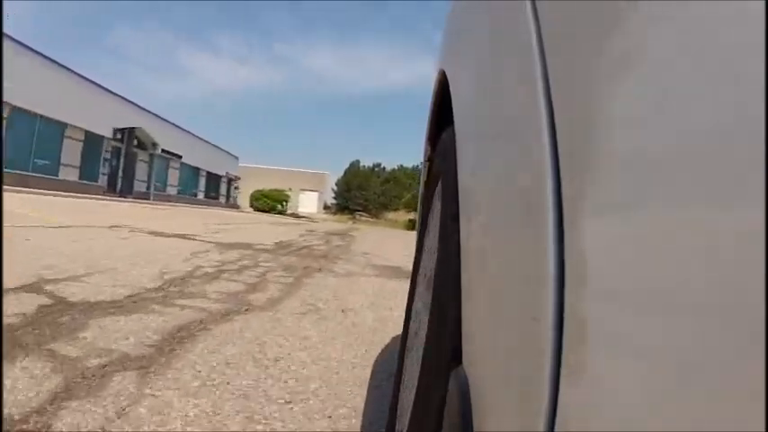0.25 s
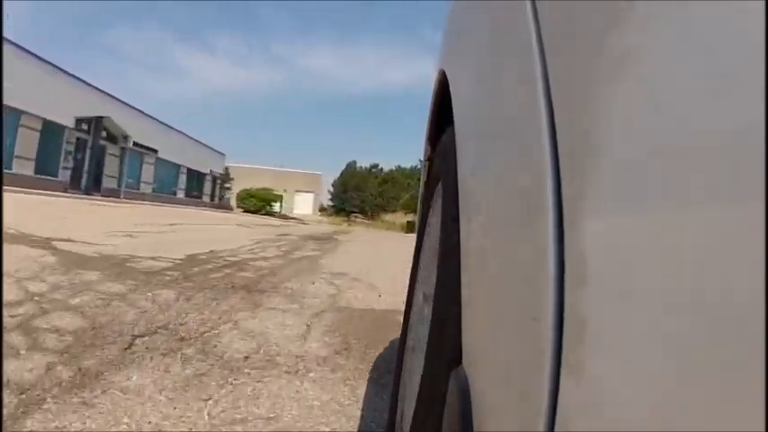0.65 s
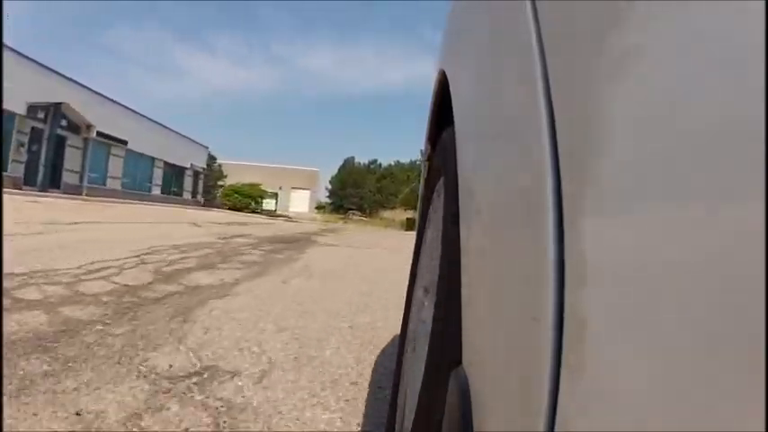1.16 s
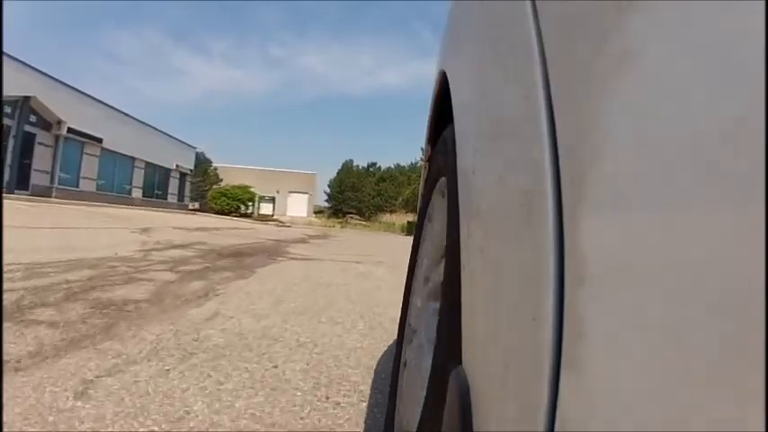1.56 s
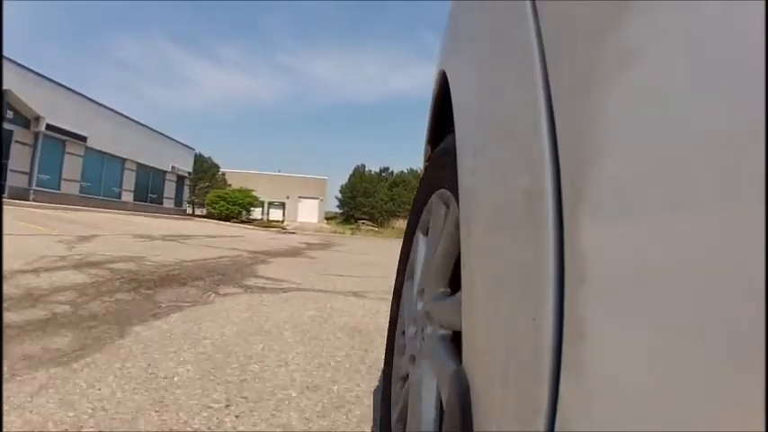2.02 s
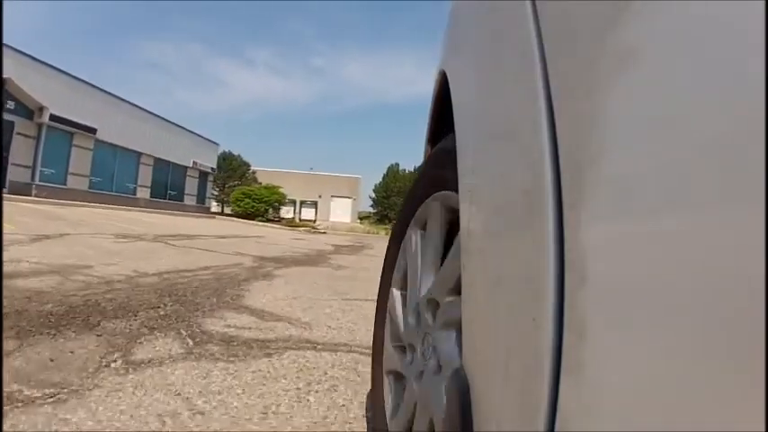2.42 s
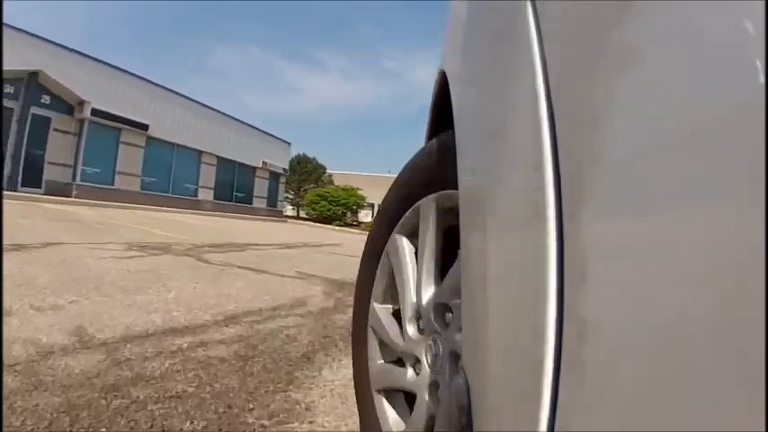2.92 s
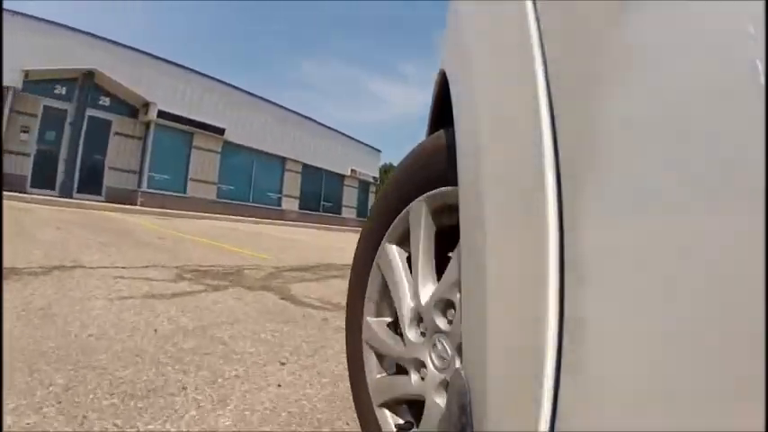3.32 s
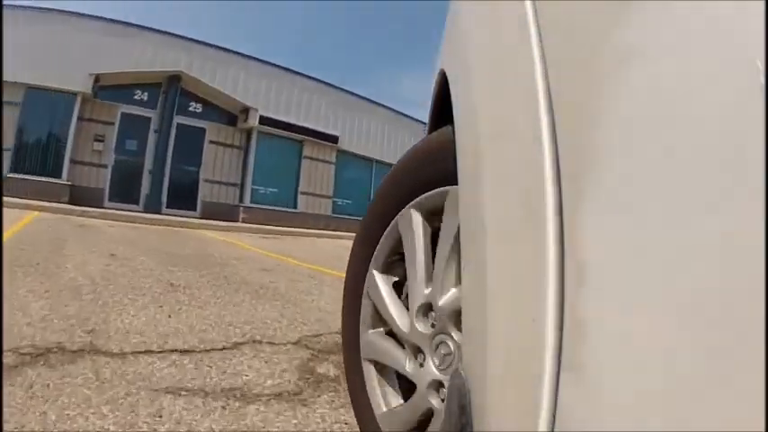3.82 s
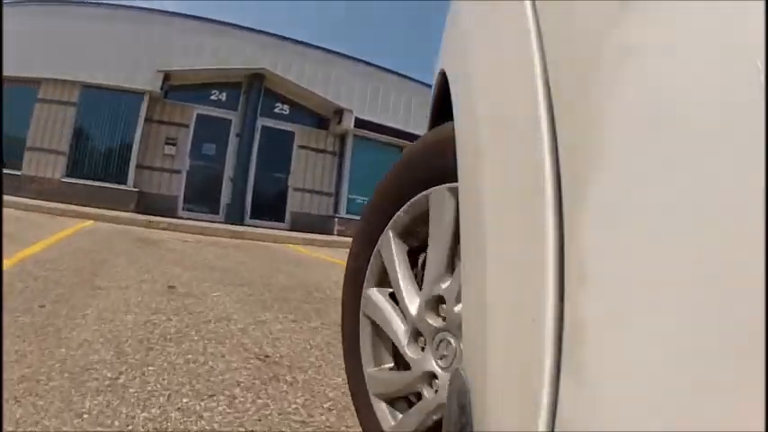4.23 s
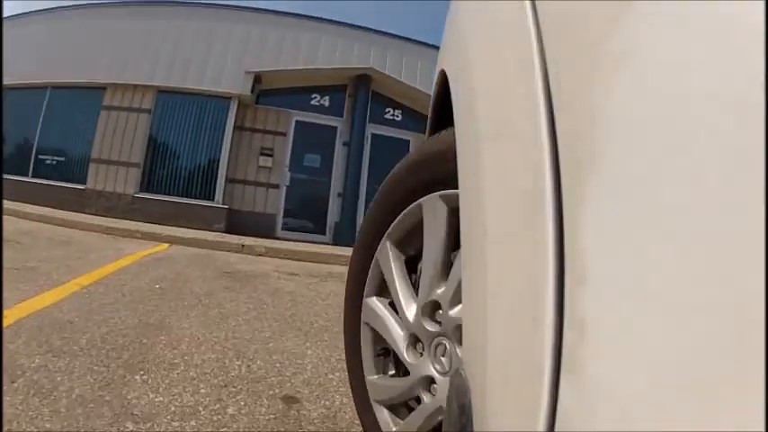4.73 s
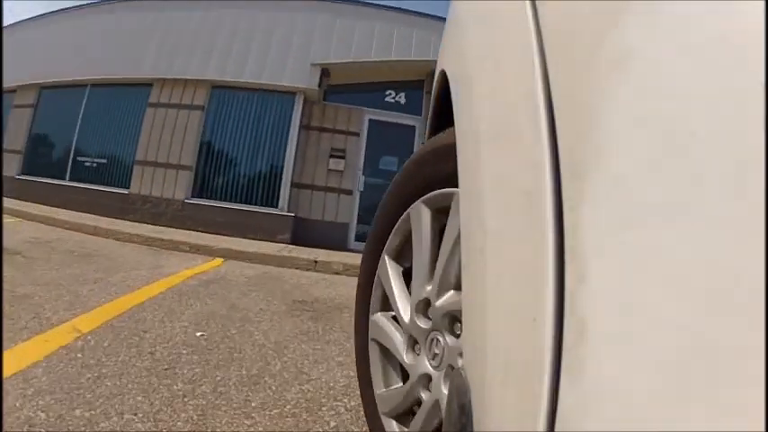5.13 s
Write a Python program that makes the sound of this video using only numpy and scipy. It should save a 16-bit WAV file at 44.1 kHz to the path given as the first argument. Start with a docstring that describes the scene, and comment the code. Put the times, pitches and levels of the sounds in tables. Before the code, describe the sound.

Close to the front wheel of a slow car, a low tyre rumble runs with light crunching and soft thumps from broken parking lot asphalt. One small stone knocks on the body early on. Later, sharp pops and clicks come more often, with two loud knocks on the panel, followed by a faint, high brake whistle. The microphone adds slight hiss and ticking.

```python
"""A car creeps over cracked, gritty asphalt; the microphone is on the body, close behind a front tyre.
From the start the tyre rumbles and crushes grit, over faint microphone hiss and ticking, and soon it
bumps over cracks and rocks through hollows. From a second in, stones snap out from under the tread and
three knock on the bodywork, loudest near the end. Last, the brake sings faintly as the car slows."""
import sys
import numpy as np
from scipy import signal
from scipy.fft import rfft, irfft
from scipy.io import wavfile
from scipy.ndimage import uniform_filter1d, map_coordinates

SR = 44100
rng = np.random.default_rng(int(sys.argv[2]) if len(sys.argv) > 2 else 0)


def inscribe(sig):
    """Save sig as 16-bit PCM at rate SR to the path in sys.argv[1].

    A 1-D sig is mono; a 2-D sig holds one channel per row.
    Samples are clipped to [-1, 1] before scaling.
    """
    pcm = np.round(np.clip(np.atleast_2d(sig).T, -1, 1) * 32767)
    wavfile.write(sys.argv[1], SR, pcm.astype(np.int16))


N = 236860
TIME = np.arange(N) / SR

# cracks under the tyre: start_s, bump_db, rise_s, pitch_hz, grit_db
CRACKS = [(0.47, -48.5, .015, 290, -54), (1.114, -50.5, 0.0035, 438, -48), (1.488, -36, 0.011, 205, -55),
          (1.561, -47.5, 0.013, 251, -52.5), (2.114, -43, 0.0022, 300, -54),
          (2.214, -54.5, 0.0068, 303, -66), (2.247, -49, 0.0072, 241, -57.5),
          (2.838, -47, 0.0029, 277, -61.5)]
# stones hitting the bodywork: start_s, knock_db, snap_db, snap_hz, brightness_hz
STRIKES = [(1.054, -25, -56, 3130, 4330), (4.316, -8, -9.5, 3740, 6160), (4.964, -10, -15.5, 4170, 5350)]
DROP_LAG_S, DROP_RISE_S = 0.04, 0.0044  # after a knock the stone drops back under the tread
PING_HZ, PING_T60_S = 6266, 0.11  # a metal part that the stones set ringing


def from_db(db):
    """Decibels to gain."""
    return 10 ** (np.asarray(db) / 20)


def rms_one(x):
    """Scale to unit rms."""
    return x / np.sqrt(np.mean(x ** 2) + 1e-20)


def in_time(curve):
    """A curve of (time, value) rows at every sample."""
    return np.interp(TIME, *np.transpose(curve))


def cut(x, hz, kind, order=2):
    """Butterworth filter."""
    return signal.sosfilt(signal.butter(order, hz, kind, fs=SR, output="sos"), x + 1e-18)


def coloured(x, spectrum):
    """Give a noise a spectrum; rms 1."""
    hz, db = np.transpose(spectrum)
    bin_hz = np.maximum(np.arange(N // 2 + 1) * SR / N, 1)
    gain = from_db(np.interp(np.log(bin_hz), np.log(hz), db))
    return rms_one(irfft(rfft(x) * gain, N))


def resonance(x, hz, width_hz):
    """Two-pole band-pass with gain 1 at its peak."""
    radius = np.exp(-np.pi * width_hz / SR)
    feedback = [1, -2 * radius * np.cos(2 * np.pi * hz / SR), radius ** 2]
    return signal.lfilter(np.array([1, 0, -1]) * (1 - radius ** 2) / 2, feedback, x + 1e-18)


def drift(per_s):
    """Smooth random wander; rms 1."""
    knots = rng.standard_normal(4096)
    return rms_one(map_coordinates(knots, [TIME * per_s], order=3, mode="wrap"))


def grains(spread_db, size=N):
    """Dense tiny contacts of uneven strength; rms 1."""
    contacts = rng.standard_normal(size)
    strength_db = spread_db * np.clip(rng.standard_normal(size), -3, 3)
    return rms_one(contacts * from_db(strength_db))


def age():
    """Seconds since a contact."""
    return np.arange(24576) / SR


def mode(hz, t60_s, shape=np.sin):
    """Free ringing of one mode."""
    return shape(2 * np.pi * hz * age()) * from_db(-60 * age() / t60_s)


def swell(rise_s, shape=1):
    """Pressure builds to 1 at the rise time and dies; a smaller shape starts faster and lingers."""
    return (age() / rise_s * np.exp(1 - age() / rise_s)) ** shape


def burst(hz, width_hz, rise_s, spread_db, shape=1):
    """A cluster of contacts swells and dies in one steep-sided resonance."""
    contacts = grains(spread_db, size=len(age()))
    ring = resonance(resonance(contacts, hz, width_hz), hz, width_hz)
    # the load is steady over six cycles, however the contacts fall
    local_rms = np.sqrt(uniform_filter1d(ring ** 2, int(6 * SR / hz)) + 1e-20)
    return ring / local_rms * swell(rise_s, shape)


def add(out, start_s, sound):
    """Mix a sound in at a time."""
    i = max(round(start_s * SR), 0)
    out[i:i + len(sound)] += sound[:N - i]


def rolling(boom_top_hz=110, rumble_top_hz=500, broken_db=3.5, broken_reach_s=0.053):
    """Road texture shakes the tyre: the carcass booms, the tread rumbles and the road grain rasps."""
    # how hard the road shakes the tyre, falling as the car slows: time_s, level_db
    shaking = [(0.0, -53), (0.73, -58), (1.43, -55.5), (1.78, -58), (2.29, -58), (3.08, -57), (3.38, -56.5),
               (4.28, -58.5), (5.37, -63)]
    # colour of the rolling noise: frequency_hz, level_db
    road_spectrum = [(12, -15), (20, 5), (59, -3), (91, 1.5), (120, -9.5), (146, -2.5), (226, -7.5),
                     (256, -18), (311, -11), (534, -21.5), (618, -22.5), (1530, -30), (1820, -33.5),
                     (7000, -53), (9100, -63), (15400, -120)]
    # resonances of the tyre: pitch_hz, width_hz, lift_db
    tyre_modes = [(85, 12, 6), (175, 75, -1), (239.8, 16, 7.5), (348, 19, 2.5), (688, 150, 4),
                  (1380, 250, 3)]
    shake_db = in_time(shaking)
    swing_db = shake_db - shake_db.mean()
    road = coloured(grains(spread_db=4), road_spectrum)
    tyre = road + sum((from_db(db) - 1) * resonance(road, hz, width) for hz, width, db in tyre_modes)
    # rougher stone, and broken asphalt on both sides of a crack, lift rumble and rasp together
    broken = sum(np.exp(-((TIME - s - rise_s) / broken_reach_s) ** 2) for s, _, rise_s, *_ in CRACKS)
    rough_db = 1.5 * drift(per_s=35) + broken_db * broken
    boom = rms_one(cut(tyre, boom_top_hz, "low", order=4))
    rumble = rms_one(cut(tyre, [boom_top_hz, rumble_top_hz], "band", order=3))
    rasp = rms_one(cut(tyre, rumble_top_hz, "high", order=4))
    return (boom * from_db(-59 + 0.8 * swing_db)
            + rumble * from_db(shake_db + 0.6 + rough_db)
            + rasp * from_db(-67 + 0.46 * swing_db + 0.78 * rough_db))


def hiss(level_db=-69.5, side_db=-7, pulse_db=-66, first_pulse_s=0.808, pulse_length_s=0.022):
    """Microphone hiss, mostly central, with a brief pulse of brighter hiss once a second."""
    # colour of the microphone's own noise: frequency_hz, level_db
    hiss_spectrum = [(500, -5.5), (3000, 4), (5600, 2.5), (7500, 0.5), (10000, -0.5), (13000, 1.5),
                     (15000, 1)]
    mid, side = coloured(rng.standard_normal((2, N)), hiss_spectrum)
    steady = mid + from_db(side_db) * side * [[1], [-1]]
    gate = abs((TIME - first_pulse_s + 0.5) % 1 - 0.5) < pulse_length_s / 2
    pulse = gate * rms_one(cut(rng.standard_normal(N), hz=3000, kind="high", order=1))
    return from_db(level_db) * steady + from_db(pulse_db) * pulse


def crunches(edge_hz=760, edge_rise_s=0.0032, drop_hz=2560, sand_hz=950, sand_rise_s=0.005):
    """Grit crumbles in bursts, also at cracks and under dropped stones; fainter sand crushes at random."""
    # grit crushed under the tread: start_s, level_db, rise_s, pitch_hz
    grit = [(0.0, -66, 0.021, 3400), (0.844, -58, 0.0035, 1020), (1.274, -56.5, 0.0021, 806),
            (1.328, -54.5, 0.0036, 1040), (1.419, -53, 0.0027, 1150), (1.552, -71, 0.021, 3540),
            (2.025, -57.5, 0.0035, 1130), (2.025, -65, 0.0095, 3870), (2.07, -61.5, 0.01, 4000),
            (2.088, -57.5, 0.0043, 1500), (2.401, -62.5, 0.008, 1050)]
    edges = [(s, grit_db, edge_rise_s, edge_hz) for s, *_, grit_db in CRACKS]
    drops = [(s + DROP_LAG_S, knock_db - 53, DROP_RISE_S, drop_hz) for s, knock_db, *_ in STRIKES]
    sand = [(s, db, sand_rise_s, sand_hz * 2 ** octaves)
            for s, db, octaves in rng.uniform([0, -69, -0.5], [TIME[-1], -63, 0.5], size=(24, 3))]
    out = np.zeros(N)
    for s, level_db, rise_s, hz in grit + edges + drops + sand:
        width_hz = min(0.87 * hz, 1700)
        add(out, s, from_db(level_db) * burst(hz, width_hz, rise_s, spread_db=5, shape=0.65))
    return cut(out, hz=5200, kind="low", order=3)


def ticking(level_db=-70):
    """Electronics by the microphone tick faintly in the treble, at uneven short gaps."""
    out = np.zeros(N)
    starts_s = np.cumsum(rng.choice([0.1, 0.15], size=60))
    for s in starts_s[starts_s < TIME[-1]]:
        add(out, s, from_db(level_db) * burst(hz=9300, width_hz=2800, rise_s=0.0035, spread_db=8))
    return cut(out, hz=[8000, 11000], kind="band")


def bumps(far_lag_s=0.029, far_rise_s=0.012, far_hz=152, wheel_hop_hz=46.1, drop_hz=230):
    """Crack edges and dropped stones make the tyre's air cavity thrum; hollows rock the whole wheel."""
    # hollows in the road: start_s, level_db, rise_s
    hollows = [(1.529, -45.5, 0.037), (2.27, -51.5, 0.075), (3.27, -49, 0.13), (3.722, -51.5, 0.064),
               (4.17, -52, 0.051)]
    near_edges = [(s, db, rise_s, hz) for s, db, rise_s, hz, _ in CRACKS]
    # the tread drops off the far edge with a softer, lower bump
    far_edges = [(s + far_lag_s, db - 9, far_rise_s, far_hz) for s, db, *_ in CRACKS]
    hops = [(s, db, rise_s, wheel_hop_hz) for s, db, rise_s in hollows]
    drops = [(s + DROP_LAG_S, knock_db - 34, DROP_RISE_S, drop_hz) for s, knock_db, *_ in STRIKES]
    out = np.zeros(N)
    for s, level_db, rise_s, hz in near_edges + far_edges + hops + drops:
        thrum = np.sqrt(2) * swell(rise_s) * np.sin(2 * np.pi * hz * age())
        rattle = burst(hz, width_hz=hz, rise_s=rise_s, spread_db=1)
        add(out, s, from_db(level_db) * (0.7 * thrum + 0.54 * rattle))
    return cut(out, hz=900, kind="low")


def pops(rebound_hz=260, rebound_lag_s=0.0015):
    """A stone snaps free with a short push of air and a faint ping; then the tread swings back in."""
    # stones squeezed out from under the tread: start_s, snap_db, snap_hz, rebound_db
    squeezed_stones = [(1.0194, -47.5, 2880, -32.5), (2.8374, -43, 3420, -53), (3.3882, -23, 4080, -39),
                       (3.401, -37.5, 3100, -30.5), (3.4645, -47, 3440, -58), (4.1669, -35.5, 4100, -32.5),
                       (4.3121, -30, 3370, -13.5), (4.378, -45, 4000, -58), (4.39, -25.5, 3040, -22.5),
                       (4.7989, -29, 4230, -34.5), (4.8276, -51, 3080, -34.5), (4.9539, -20, 3120, -20),
                       (5.0295, -25.5, 3220, -23.5)]
    snaps, thuds, pings = np.zeros((3, N))
    for s, snap_db, snap_hz, rebound_db in squeezed_stones:
        snap_t60_s = 0.0035 * (3000 / snap_hz) ** 2.8  # smaller stones snap higher and die sooner
        snap = from_db(snap_db) * mode(snap_hz, snap_t60_s)
        air_push = 0.34 * from_db(rebound_db) * mode(rebound_hz, t60_s=0.0022, shape=np.cos)
        add(snaps, s, snap + air_push)
        add(thuds, s + rebound_lag_s, -from_db(rebound_db) * mode(rebound_hz, t60_s=0.011))
        add(pings, s, -from_db(snap_db - 38) * mode(PING_HZ, PING_T60_S))
    return cut(snaps, hz=5500, kind="low", order=5) + cut(thuds, hz=920, kind="low") + pings


def strikes(contact_hz=4200, chatter_gap_s=0.0029, chatter_fall_db=4.5):
    """A flung stone knocks on the panel, which chatters briefly and sets a metal part pinging."""
    # modes of the body panel: pitch_hz, level_db, t60_s
    panel_modes = [(69, -20, 0.093), (132, -16, 0.03), (187, -16.5, 0.028), (265, -8, 0.025),
                   (405, -39, 0.03), (718, -31.5, 0.059), (1190, -23, 0.0064), (2690, -17.5, 0.0095)]
    panel = sum(from_db(db) * mode(hz, t60_s, np.cos) for hz, db, t60_s in panel_modes)
    out = np.zeros(N)
    for s, knock_db, snap_db, snap_hz, brightness_hz in STRIKES:
        snap = from_db(snap_db) * mode(snap_hz, t60_s=0.0012)
        knock = from_db(knock_db) * cut(panel, contact_hz, "low", order=1)
        ping = from_db(snap_db - 34) * mode(PING_HZ, PING_T60_S)
        sharp_edge = from_db(-26) * snap
        add(out, s, cut(snap + knock, brightness_hz, "low", order=5) + sharp_edge - ping)
        # the swinging panel touches its mount about once a cycle, each time more lightly
        for k, (jitter, detune) in enumerate(rng.uniform(-0.25, 0.25, size=(5, 2))):
            touch_db = snap_db - 25 - chatter_fall_db * k
            touch = from_db(touch_db) * mode(snap_hz * (1 + detune), t60_s=0.0026)
            add(out, s + (k + 1 + jitter) * chatter_gap_s, touch)
    return out


def wheel_arch(direct, scatter_t60_s=0.085):
    """Arch and ground scatter a short, weak tail; reflections off the body cancel a few bands."""
    # bands that cancel at the microphone: centre_hz, width_hz, depth_fraction
    dips = [(520, 117, 0.42), (1530, 1400, 0.45), (1870, 106, 1)]
    decay = from_db(-41 - 60 * age() / scatter_t60_s) / 2
    tail = cut(grains(spread_db=1, size=len(decay)) * decay, hz=400, kind="high", order=1)
    out = direct + signal.fftconvolve(direct, tail)[:N]
    for hz, width_hz, depth in dips:
        out = out - depth * resonance(out, hz, width_hz)
    return out


def thin_ring(start_s=4.987, level_db=-58):
    """A light touch leaves a thin ring after the last knock."""
    out = np.zeros(N)
    add(out, start_s, from_db(level_db) * mode(hz=3750, t60_s=0.26))
    return out


def brake(whistle_db=-3, rub_db=-4):
    """Pad friction: two narrow, unsteady whistles over a soft rub."""
    # how hard the pad rubs: time_s, level_db
    rubbing = [(0, -120), (5.0, -110), (5.08, -69), (5.2, -75.5), (5.37, -73)]
    # resonances of the brake: pitch_hz, width_hz, level_db
    brake_modes = [(5220, 220, 0), (5660, 420, -6)]
    friction = rng.standard_normal(N)
    whistle = sum(from_db(db) * rms_one(resonance(resonance(friction, hz, width), hz, width))
                  for hz, width, db in brake_modes)
    rub = rms_one(cut(friction, hz=[2500, 6500], kind="band"))
    return from_db(in_time(rubbing)) * (from_db(whistle_db) * whistle + from_db(rub_db) * rub)


def scene():
    """Everything at the wheel reaches both channels alike; only the hiss has width."""
    tyre = rolling() + bumps() + crunches()
    stones = wheel_arch(pops() + strikes())
    return tyre + stones + thin_ring() + brake() + hiss() + ticking()


def record(dry, cutoff_hz=15300):
    """The top treble is cut steeply."""
    return signal.sosfilt(signal.ellip(12, 0.1, 80, cutoff_hz, fs=SR, output="sos"), dry)


dry = scene()
out = record(dry)
inscribe(out)
```